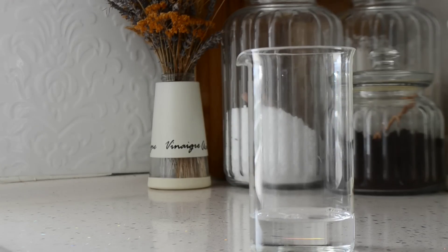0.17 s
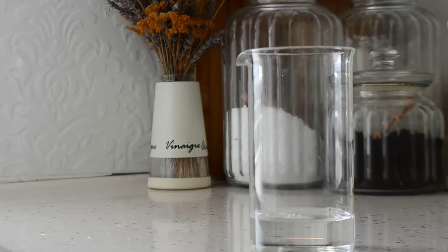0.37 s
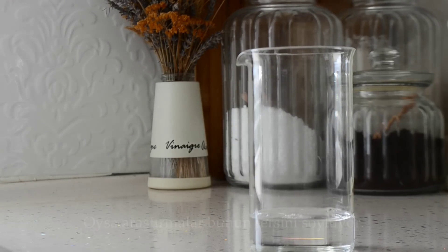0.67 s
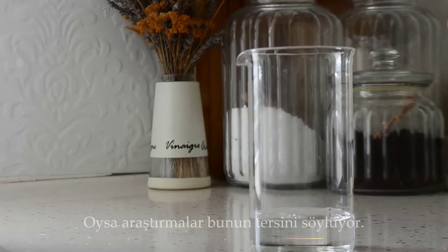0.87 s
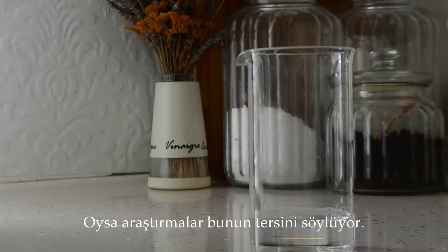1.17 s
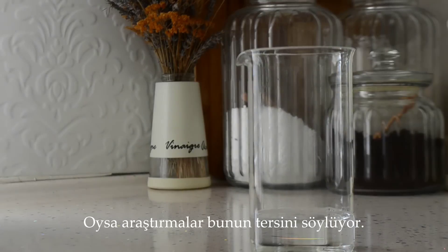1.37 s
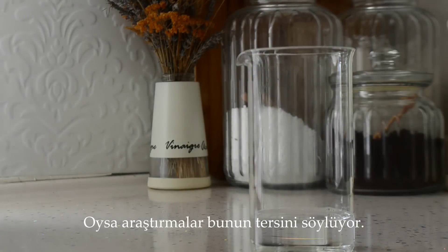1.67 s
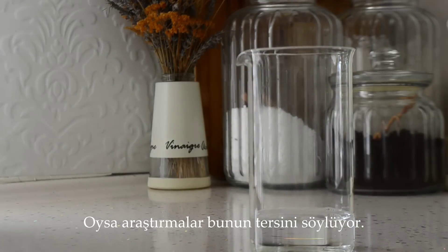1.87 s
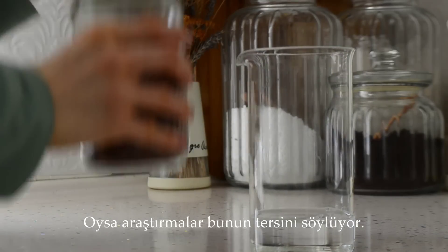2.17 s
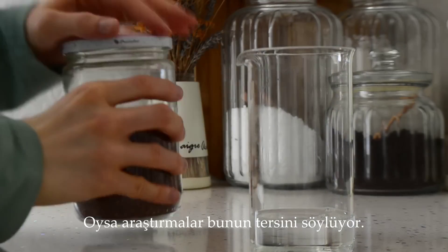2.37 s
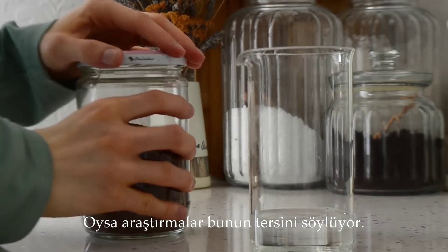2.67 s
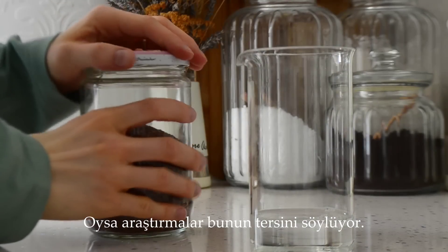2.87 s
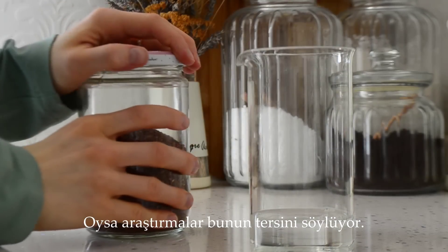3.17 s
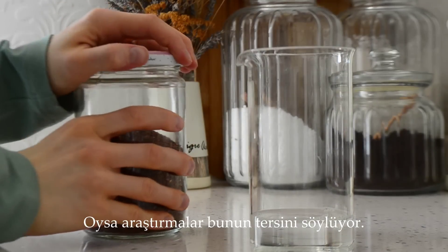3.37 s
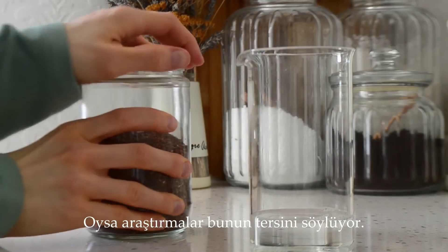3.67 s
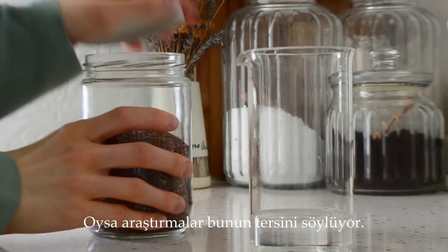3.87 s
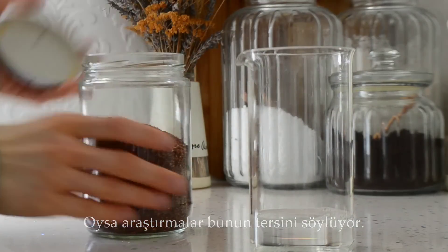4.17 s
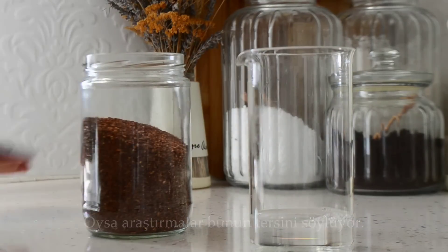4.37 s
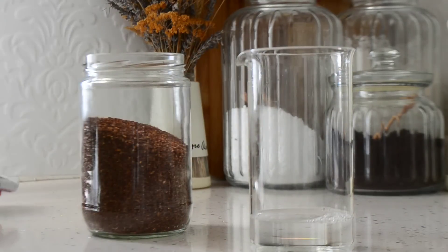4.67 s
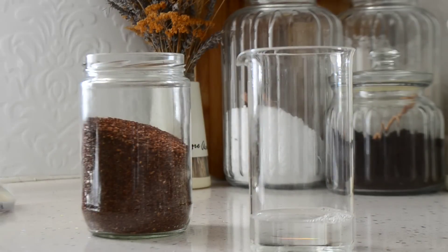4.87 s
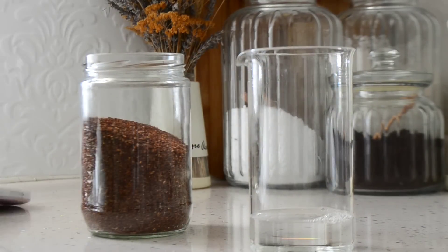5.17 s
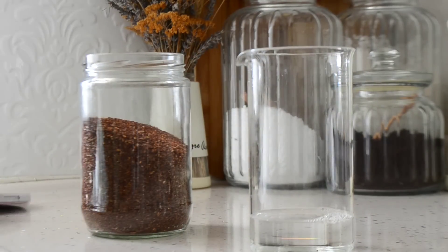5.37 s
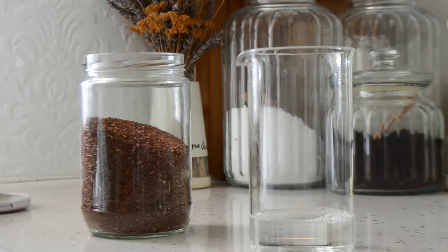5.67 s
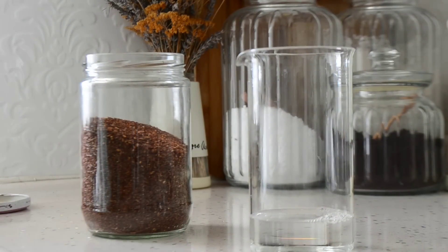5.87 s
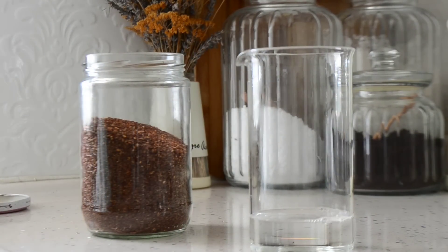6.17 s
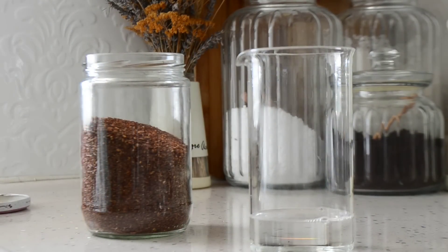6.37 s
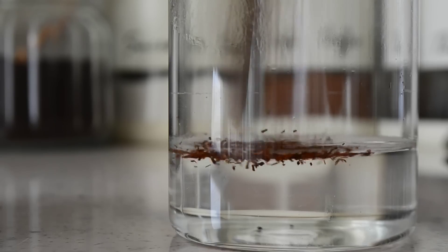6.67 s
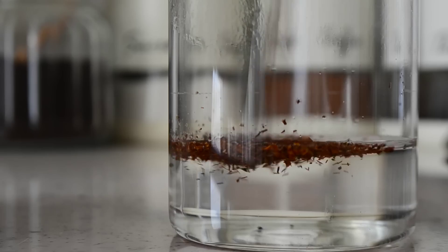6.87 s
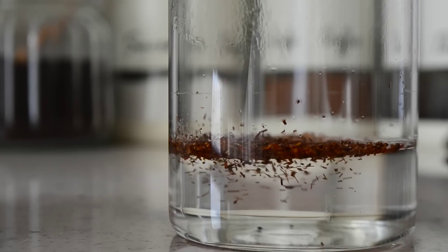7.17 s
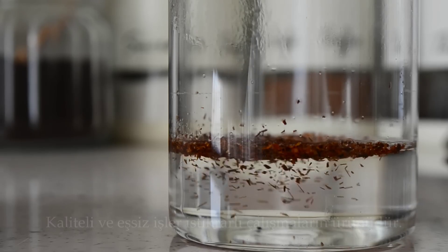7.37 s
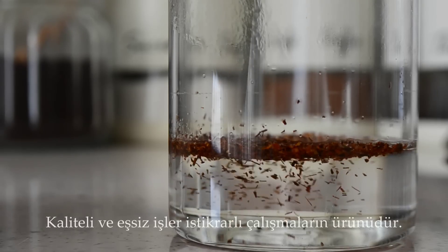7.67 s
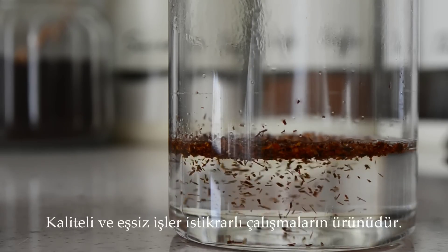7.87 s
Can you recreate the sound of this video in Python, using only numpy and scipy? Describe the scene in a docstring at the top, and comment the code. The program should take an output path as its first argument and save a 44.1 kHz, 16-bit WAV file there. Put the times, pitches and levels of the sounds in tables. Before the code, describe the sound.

In a quiet hard-walled kitchen with faint hum, cloth rustles and a wooden cupboard is knocked and slid. A full glass jar lands on stone with a very loud, dull clunk. Its metal lid pops loose, is put down with a ringing tap, rocks faster and faster, and slaps flat. Very faint dry leaves then tick into a glass jug. Close microphone, short room echo.

```python
"""A full glass jar is set on a stone counter and its metal lid twisted off; the lid is put down, rocks on its
rim and falls flat. Random bursts of force excite damped modes of the struck body.
A cupboard is knocked and slid, two faint dull bumps follow, and dry leaves tick into a glass jug: in slide and
leaves many tiny impacts shake wood or glass. Cloth and skin rustle.
A quiet hard-walled kitchen adds echoes, air noise, appliance hum, a whine and bass."""
import sys
import numpy as np
from scipy import signal
from scipy.fft import rfft, irfft, next_fast_len
from scipy.io import wavfile
from scipy.ndimage import uniform_filter1d

SR = 44100
rng = np.random.default_rng(int(sys.argv[2]) if len(sys.argv) > 2 else 0)


def master_out(mix):
    """Clip the mix to full scale and print it as 16-bit PCM to the path in sys.argv[1]."""
    frames = np.transpose(np.atleast_2d(mix))
    ceiling = np.clip(frames, -1, 1)
    pcm = np.round(ceiling * 32767).astype(np.int16)
    wavfile.write(sys.argv[1], SR, pcm)


def to_linear_factor(level_db):
    """Convert decibel levels (scalar or array-like) to linear amplitude factors."""
    exponent = np.asarray(level_db, float) / 20
    return 10 ** exponent


N = 353108
T = np.arange(N) / SR

# Modes of the full glass jar; damping scales the widths: mode_hz, width_hz, level_db
JAR_MODES = [(333, 30, -16.5), (480, 62, -13.5), (610, 16, 9.5), (697, 26, 7.5), (840, 16, -8.5),
             (886, 18, 0), (1040, 32, -2.5), (1134, 18, 8.5), (1147, 1, -8), (1287, 16, 4.5),
             (1234, 81, -1.5), (1530, 14, 0), (1360, 16, 0), (1540, 16, -14.5), (1602, 19, -2.5),
             (1870, 5.1, -15.5), (1911, 16, -8), (2035, 20, -7), (2274, 25, -8), (2519, 20, -10),
             (2762, 120, -32), (7130, 40, -55), (7800, 40, -44)]
# Modes of the metal lid; damping scales the widths: mode_hz, width_hz, level_db
LID_MODES = [(874, 69, -8.5), (1183, 18, -0.5), (1400, 15, 3.5), (1445, 54, 1), (1620, 52, -22),
             (1996, 12, -1), (2200, 8.2, -16), (2618, 33, 5), (2600, 6, -30), (2940, 30, -33),
             (3250, 6.8, -2), (3320, 23, 2.5), (3548, 51, 0.5), (3795, 4.9, -1), (4080, 15, 0.5),
             (4300, 270, -8.5), (4890, 17, -11), (5220, 69, -11.5), (6013, 6, -25), (6153, 6, -17),
             (6480, 19, -13.5), (6770, 40, -15), (7700, 58, -25), (7905, 11, -14), (8370, 130, -23),
             (9690, 56, -48), (10400, 110, -22.5), (11900, 48, -46), (11800, 62, -44), (13300, 51, -84)]
# Modes of the wooden cupboard; damping scales the widths: mode_hz, width_hz, level_db
WOOD_MODES = [(295, 94, 12), (558, 60, 11), (1560, 25, -21), (2000, 22, -17), (2130, 24, -19),
              (2680, 93, -30), (2770, 230, -21)]


def unit(x):
    """Normalisation: scale to an rms of 1."""
    return x / np.sqrt(np.mean(x ** 2) + 1e-30)


def colour(x, points):
    """Linear filtering: shape the spectrum through (frequency_hz, level_db) points."""
    hz, db = np.transpose(points)
    size = next_fast_len(len(x))
    log_hz = np.log(np.arange(size // 2 + 1) * SR / size + 1)
    gain = to_linear_factor(np.interp(log_hz, np.log(hz), db))
    return irfft(rfft(x, size) * gain, size)[:len(x)]


def band(x, lo_hz, hi_hz, order=2):
    """Band limitation: pass only the range between two corner frequencies."""
    corners = [lo_hz, min(hi_hz, .45 * SR)]
    return signal.sosfilt(signal.butter(order, corners, "bandpass", fs=SR, output="sos"), x)


def curve(rows):
    """Amplitude envelope: gain through (time_s, level_db) rows, silent outside them."""
    s, db = np.transpose(rows)
    inside = np.clip(np.minimum(T - s[0], s[-1] - T) / 0.0029, 0, 1)
    return to_linear_factor(np.interp(T, s, db)) * inside


def swells(rows):
    """Power sum of exponential swells (peak_s, level_db, rise_s, fall_s); rise and fall span 20 dB."""
    s, db, rise, fall = np.transpose(rows)[:, :, None]
    slope = np.maximum((s - T) / rise, (T - s) / fall)
    return np.sqrt(np.sum(to_linear_factor(db - 20 * slope) ** 2, axis=0))


def walk(rate_hz):
    """Slow random modulation: levels held for 1 / rate_hz, then smoothed twice."""
    k = int(SR / rate_hz)
    held = np.repeat(rng.standard_normal(N // k + 1), k)
    return uniform_filter1d(uniform_filter1d(held, k), k)[:N]


def grit(size, rate_hz, spread_db):
    """Shot noise: random tiny impacts of either sign, many weak and a few strong."""
    occurs, sign, strength = rng.random((3, size))
    return (occurs < rate_hz / SR) * np.sign(sign - .5) * to_linear_factor(-spread_db * np.log(1 - .98 * strength))


def modes(table, scatter_db, damping=0.6):
    """Modal synthesis: decaying sines scattered by the place of the blow; damping scales their widths."""
    hz, width, db = np.transpose(table)[:, :, None]
    level_chance, sign_chance = rng.standard_normal((2, len(table), 1))
    t = T[:16000]
    gain = to_linear_factor(db + scatter_db * level_chance) * width * np.sign(sign_chance)
    decay = np.exp(-np.pi * width * damping * t)
    return (gain * decay * np.sin(2 * np.pi * hz * t)).sum(axis=0)


def blows(rows, body, swell, first, crack_hz, damping):
    """Impact excitation: a chattering contact force gives a dull thud, a bright crack and the body's ring."""
    out = np.zeros(N + 24000)
    for s, db, crack_db, thud_hz, ring_db, contact_s in rows:
        u = T[:5000] / contact_s
        force = u ** swell * np.exp(-2.5 * u) * grit(5000, 16000, 5.4)
        force[0] = first * np.sqrt(np.sum(force ** 2))  # the first click
        thud = band(force, thud_hz / 2.28, 4600)
        thud = signal.sosfilt(signal.butter(4, thud_hz * 1.484, fs=SR, output="sos"), thud)
        crack = band(force, *crack_hz)
        ring = signal.fftconvolve(force, modes(body, 0.61, damping))
        for part, part_db in ((thud, 0), (crack, crack_db), (ring, ring_db)):
            peak = np.sqrt(2 * uniform_filter1d(part ** 2, size=200).max())
            out[int(s * SR):][:len(part)] += to_linear_factor(db + part_db) * part / peak
    return out[:N]


def with_ring(rows, ring_db):
    """Modal coupling: give every burst the same ring level relative to its thud."""
    return [(s, db, crack_db, hz, ring_db, contact_s) for s, db, crack_db, hz, contact_s in rows]


def rubbing(level, points, body, rate_hz, spread_db, ring_db):
    """Friction as shot noise: dense slips, partly heard directly and partly through the body they shake."""
    slips = colour(grit(N, rate_hz, spread_db), points)
    ring = signal.fftconvolve(slips * level, modes(body, 0.))[:N]
    return unit(slips) * level + to_linear_factor(ring_db) * unit(ring) * np.sqrt(np.mean(level ** 2))


def jar_on_stone():
    """Impact: the full jar is set on the stone, its glass modes heavily damped."""
    # The jar's blow, with a brief crack at 2.577 s where the peak overloads, and weaker sounds after it;
    # crack level relative to thud: start_s, thud_db, crack_db, thud_hz, contact_s
    jar_bursts = [(2.573, -0.5, -53.5, 1100, 0.0054), (2.577, -2, -48, 960, 0.0015),
                  (2.624, -14, -49, 1350, .004), (2.87, -38.5, -44, 510, .006)]
    return blows(with_ring(jar_bursts, -4.5), JAR_MODES, 0.37, 0.83, (2800, 9000), damping=2.7)


def lid_twisted_off():
    """Stick and release: thread pops ring the jar, whose modes the hand damps strongly."""
    # Thread pops, crack level relative to thud: start_s, thud_db, crack_db, thud_hz, contact_s
    thread_pops = [(3.328, -50, -23, 2400, 0.0057), (3.451, -28, -41, 810, 0.0033),
                   (3.458, -17.5, -32.5, 1020, 0.0063), (3.48, -21, -44, 850, 0.0036),
                   (3.504, -27, -22.5, 1260, 0.025), (3.628, -26, -34, 527, 0.0081),
                   (3.63, -27.5, -14.5, 1600, 0.021), (3.78, -37.5, -33, 480, 0.015)]
    return blows(with_ring(thread_pops, -3), JAR_MODES, 0.32, 0.77, (2200, 9000), damping=6.5)


def lid_taps():
    """Free vibration: the rim taps the stone and the lid is free to ring."""
    # Rim contacts, crack level relative to thud: start_s, thud_db, crack_db, thud_hz, contact_s
    rim_taps = [(4.736, -55, -27, 442, .01), (4.912, -18.5, -14, 1760, 0.016),
                (5.088, -36, -31, 2585, .005), (5.175, -37.5, -43, 1460, 0.013),
                (5.227, -53, -7, 1450, 0.0027)]
    return blows(with_ring(rim_taps, -3), LID_MODES, 0.28, 0.23, (3000, 15000), damping=0.94)


def lid_rocks():
    """Rocking on the rim: the taps crowd together and each contact is briefer than the one before."""
    # Taps of the rocking rim: start_s, thud_db
    rock_taps = [(5.264, -29), (5.352, -29), (5.446, -31.5), (5.522, -30), (5.588, -29), (5.648, -30),
                 (5.703, -32), (5.757, -35.5), (5.792, -32.5)]
    first_contact_s, shortening = 0.024, 0.91
    crack_db, thud_hz, ring_db = -8.5, 1980, 3.2  # crack and ring relative to thud
    rows = [(s, db, crack_db, thud_hz, ring_db, first_contact_s * shortening ** k)
            for k, (s, db) in enumerate(rock_taps)]
    return blows(rows, LID_MODES, 2.22, 0, (3000, 12000), damping=1.0)


def lid_falls_flat():
    """Contact damping: the whole rim meets the stone, which stifles the ring."""
    # Contacts, crack level relative to thud: start_s, thud_db, crack_db, thud_hz, contact_s
    flat_contacts = [(6.012, -42, -5, 1500, 0.0063), (6.048, -39, -27, 1220, 0.0066),
                     (6.093, -53.5, 3, 2000, 0.005), (6.115, -18.5, -11, 1065, 0.011),
                     (6.135, -26.5, -15, 790, 0.0114)]
    return blows(with_ring(flat_contacts, -32), LID_MODES, 0.39, 0.3, (2500, 15000), damping=3.2)


def lid_rolls():
    """Rolling friction: the rim grinds round on the stone and shakes the lid."""
    # Level of the grinding: time_s, level_db
    roll_level = [(5.16, -44.5), (5.29, -53.5), (5.45, -42), (5.69, -41), (6.12, -53)]
    # Spectrum of the grinding: frequency_hz, level_db
    roll_colour = [(24, -48), (40, -1), (262, 8), (993, 5.5), (1400, 9), (1710, 0.5), (2620, -3),
                   (3080, -31), (3410, -22), (5000, -22), (6500, -50.5), (11000, -120)]
    return rubbing(curve(roll_level), roll_colour, LID_MODES, 6000, 0.9, -14.0)


def lid_buzz():
    """Fusion of fast taps into pitch: a wavering low tone, cut off when the lid falls flat."""
    # Last fast rocking, before its random flutter: peak_s, level_db, rise_s, fall_s
    buzz_swells = [(5.675, -48.5, 0.088, 0.3), (5.9, -44.5, 0.1, 1.8)]
    pitch_hz, waver_hz, end_s = 268, 4.5, 6.112
    phase = 2 * np.pi * np.cumsum(pitch_hz + waver_hz * walk(25)) / SR
    cut = np.clip((end_s - T) / .006, 0, 1)
    level = swells(buzz_swells) * cut * to_linear_factor(1.9 * walk(53))
    return np.sqrt(2) * level * (np.sin(phase) + 0.12 * np.sin(2 * phase))


def knocks_and_bumps():
    """Impact excitation of broad, quickly decaying modes: cupboard knocks, then two faint dull bumps."""
    # Cupboard knocks, and two faint dull bumps at 3.239 and 5.166 s; crack and ring relative to thud:
    # start_s, thud_db, crack_db, thud_hz, ring_db
    knock_rows = [(0.843, -41, -8, 2000, -7), (1.177, -25, -39, 310, -3), (1.342, -31.5, -30, 454, -1),
                  (1.394, -30.5, -32, 600, 4), (1.467, -21.5, -37, 394, -12), (1.5, -19, -41, 400, -23),
                  (1.518, -29.5, -43, 600, -8), (1.552, -26, -25, 910, -4.5), (1.625, -42, -30, 453, -7),
                  (1.692, -47, -19, 1200, -20), (3.239, -41.5, -32, 350, -31), (5.166, -48, -23, 252, -31)]
    contact_s = 0.007
    rows = [row + (contact_s,) for row in knock_rows]
    return blows(rows, WOOD_MODES, 0.036, 0.49, (2200, 7000), damping=0.58)


def cupboard_slide():
    """Sliding friction: uneven slips shake the wood."""
    # Level of the slide: time_s, level_db
    slide_level = [(1.392, -38), (1.5, -24), (1.575, -41), (1.65, -66)]
    # Spectrum of the slips: frequency_hz, level_db
    slide_colour = [(35, -73), (60, -34), (125, -17.5), (315, 4), (472, 1), (540, 3.5), (2250, -27),
                    (2720, -28.5), (6000, -54), (7800, -81), (13200, -120)]
    return rubbing(curve(slide_level), slide_colour, WOOD_MODES, 1500, 5.6, -7.0)


def leaves_in_jug():
    """Shot excitation: dry leaves tick against the glass and ring the jug's high modes."""
    # Swells of the pour: peak_s, level_db, rise_s, fall_s
    pour_swells = [(6.63, -70, .08, 0.32), (6.755, -77, .06, 0.26)]
    # Modes of the jug, widths scaled by damping: mode_hz, width_hz, level_db
    jug_modes = [(4393, 30, -2), (5660, 28, 8), (7170, 30, -4), (8608, 28, 2), (9550, 47, -10),
                 (10207, 38, -14), (12600, 120, -17)]
    tick_colour = [(2000, -22), (6000, -11), (11000, -2.0), (13000, -5), (15000, -12)]  # frequency_hz, level_db
    return rubbing(swells(pour_swells), tick_colour, jug_modes, 1500, 3.0, -1.8)


def rustle():
    """Friction of cloth and skin: shot noise of fine grains under an uneven level."""
    # Moves of sleeves and hands, before the random flutter: peak_s, level_db, rise_s, fall_s
    rustle_swells = [(0.86, -64, .3, 0.16), (1.0, -69.5, 0.58, 0.56), (1.17, -56, .1, 0.3),
                     (1.37, -54.5, 0.25, .15), (1.5, -59, 0.3, 0.1), (3.046, -62.5, .04, .02),
                     (3.164, -68, 0.16, 0.042), (3.45, -69, .03, .015), (4.36, -63, .42, 0.82),
                     (4.895, -59.5, 0.42, 0.02), (7.984, -73, .13, .02)]
    # Spectrum of the grains: frequency_hz, level_db
    rustle_colour = [(300, -9.5), (1000, 10), (3000, 0), (6000, -11), (9000, -8), (13000, -12),
                     (16000, -22)]
    grains = unit(colour(grit(N, 6000, 2.9), rustle_colour))
    return grains * to_linear_factor(2.9 * walk(35)) * swells(rustle_swells)


def room(x):
    """Reverberation: direct sound, decaying diffuse tails that trade places, and lowest standing waves."""
    # Diffuse tail: frequency_hz, t60_s, level_db
    tail_bands = [(60, 0.65, -2.5), (200, 0.51, 3), (600, 0.33, 2.5), (1500, 0.44, 1.5), (3000, 0.41, -1.5),
                  (5020, 0.24, -6), (8030, 0.29, -7.5), (13680, 0.21, -17.5)]
    # Lowest standing waves, widths scaled by damping: mode_hz, width_hz, level_db
    standing_modes = [(58, 3.3, -11.5), (158.7, 5, 17)]
    direct_db, standing_db, onset_s = -4, -23.5, 0.001
    # steady rates at which four random echo tails trade places, evening out their colour
    trade_hz = (2.3, 3.7)
    hz, t60, db = np.transpose(tail_bands)
    t = T[:30000]
    onset = np.clip(t / onset_s, 0, 1) ** 2
    tails = 0
    for centre in 45 * 2 ** np.arange(0, 8.6, .5):  # half-octave bands
        at = np.log(centre), np.log(hz)
        fade = np.exp(-np.log(1000) * t / np.interp(*at, t60)) * onset
        noise = band(rng.standard_normal((4, len(t))), centre / 2 ** .25, centre * 2 ** .25)
        noise = fade * noise
        # energy in proportion to bandwidth
        scale = np.sqrt(.7 * centre / SR / np.sum(noise ** 2, axis=1, keepdims=True))
        tails = tails + to_linear_factor(np.interp(*at, db)) * noise * scale
    turn = 2 * np.pi * np.outer(trade_hz, T)
    feeds = x * np.vstack([np.cos(turn), np.sin(turn)]) / np.sqrt(2)
    wet = signal.fftconvolve(feeds, tails, axes=1).sum(axis=0)
    standing_response = to_linear_factor(standing_db) * unit(modes(standing_modes, 0.)) / np.sqrt(16000)
    standing = signal.fftconvolve(x, standing_response)
    return to_linear_factor(direct_db) * x + wet[:N] + standing[:N]


def still_air():
    """Filtered random noise: still air with a slowly drifting level."""
    # Spectrum of the air noise: frequency_hz, level_db
    air_colour = [(12, -38), (20, -7.5), (53, -0.5), (161, -3.5), (245, -2), (439, -5), (581, -3.5),
                  (686, -7), (834, -5), (2270, -16.5), (3640, -22.5), (4550, -29), (5230, -33),
                  (10800, -41), (15500, -42)]
    level_db, drift_db = -56.5, .8
    return to_linear_factor(level_db + drift_db * walk(3.4)) * unit(colour(rng.standard_normal(N), air_colour))


def appliance():
    """Narrow-band noise: an appliance hums in separate bands."""
    # Bands of the hum: centre_hz, width_hz, level_db
    hum_bands = [(50, 24, -72.5), (195.3, 8.2, -66), (1050, 190, -67), (2810, 260, -78), (3743, 100, -84.5),
                 (4510, 80, -89), (5313, 78, -87.5)]
    return sum(to_linear_factor(db) * unit(band(rng.standard_normal(N), hz - width / 2, hz + width / 2))
               for hz, width, db in hum_bands)


def whine():
    """Pure tone: a steady, thin high sine."""
    pitch_hz, level_db = 15676.5, -86.5
    return np.sqrt(2) * to_linear_factor(level_db) * np.sin(2 * np.pi * pitch_hz * T)


def rumble():
    """Structure-borne sound: bass thumps through counter and floor as swelling low noise."""
    # Thumps: peak_s, level_db
    thumps = [(0.0, -44.5), (1.431, -64), (2.601, -39.5), (3.18, -54), (3.49, -42.5), (4.97, -55.5),
              (5.2, -50), (5.9, -55), (6.15, -42), (7.84, -66)]
    rise_s, fall_s = 0.091, 0.28
    level = swells([row + (rise_s, fall_s) for row in thumps])
    return level * unit(band(rng.standard_normal(N), 45, 130))


def scene():
    """Superposition: the handled objects sound in the room; the buzz and background add directly."""
    lid = lid_twisted_off() + lid_taps() + lid_rocks() + lid_falls_flat() + lid_rolls()
    wooden = knocks_and_bumps() + cupboard_slide()
    handled = jar_on_stone() + lid + wooden + leaves_in_jug() + rustle()
    background = still_air() + appliance() + whine() + rumble()
    return (room(handled) + lid_buzz() + background)[None]


def roll_off(x):
    """The treble ends steeply here."""
    return signal.sosfilt(signal.butter(12, 15750, fs=SR, output="sos"), x)


def record(dry):
    """Band limits: a bass cut and a steep treble cut; peaks clip at full scale."""
    bass_cut_hz, top_hz = 45, 15760
    heard = signal.sosfilt(signal.butter(3, bass_cut_hz, "highpass", fs=SR, output="sos"), dry)
    heard = signal.sosfilt(signal.ellip(8, .2, 60, top_hz, fs=SR, output="sos"), heard)
    return roll_off(np.clip(heard, -1, 1))


dry = scene()
out = record(dry)
master_out(out)
```